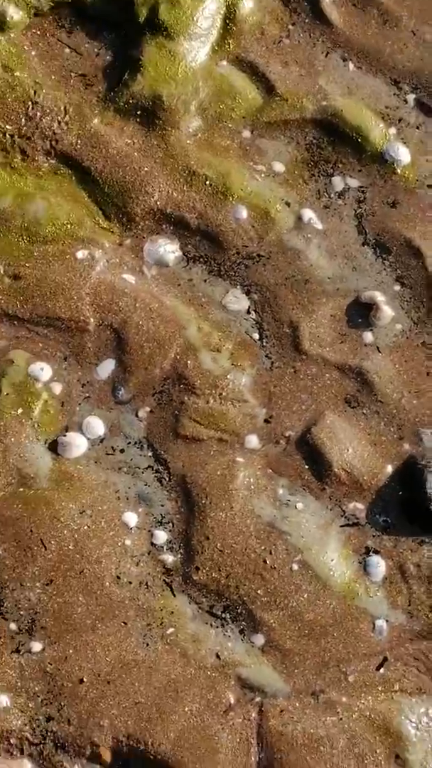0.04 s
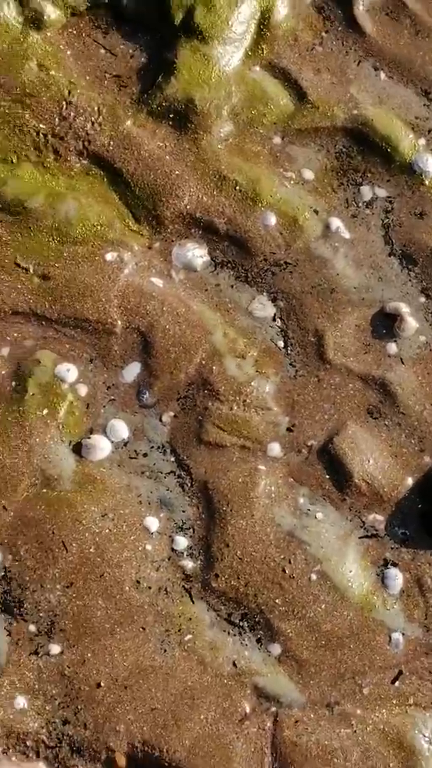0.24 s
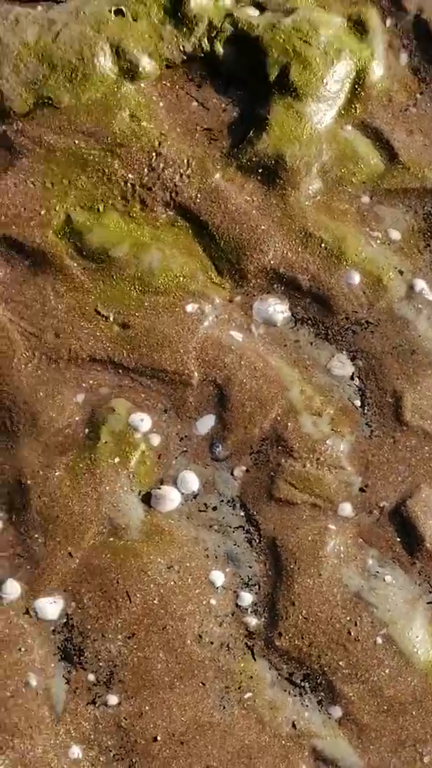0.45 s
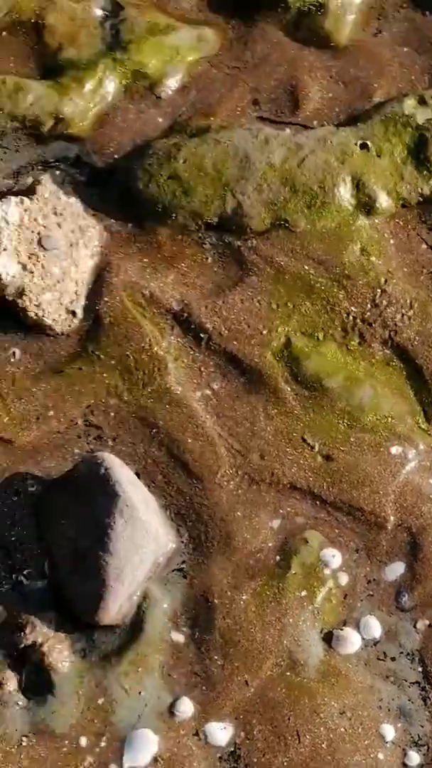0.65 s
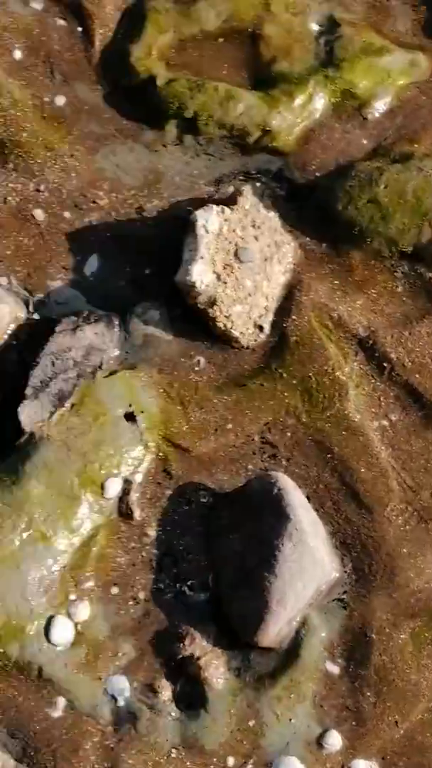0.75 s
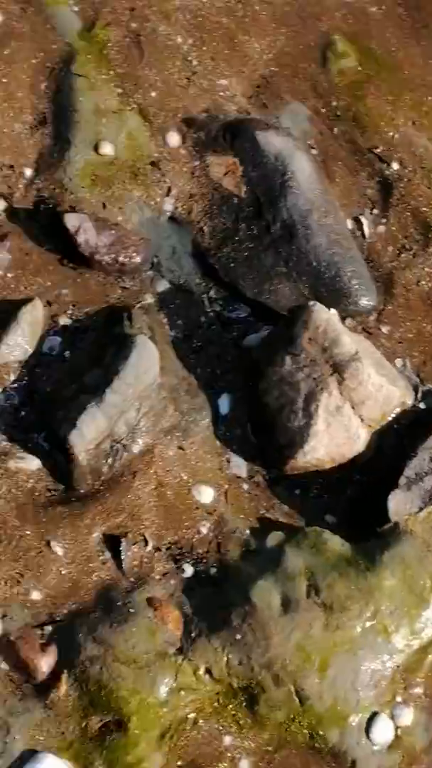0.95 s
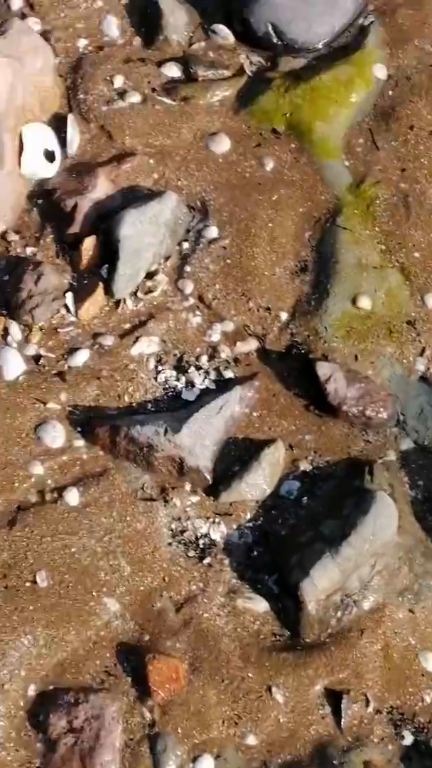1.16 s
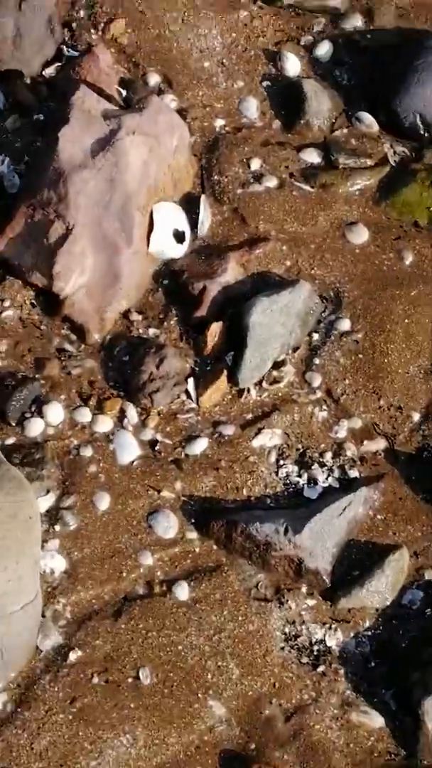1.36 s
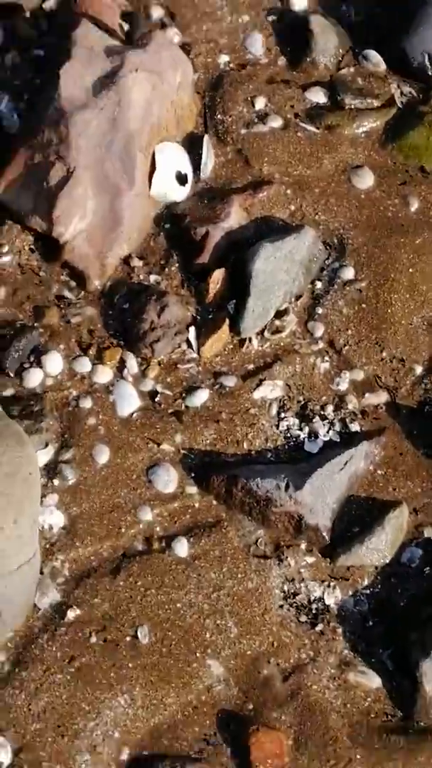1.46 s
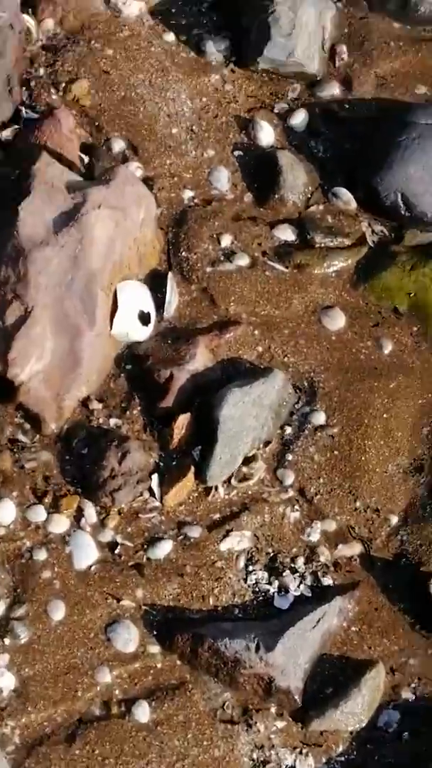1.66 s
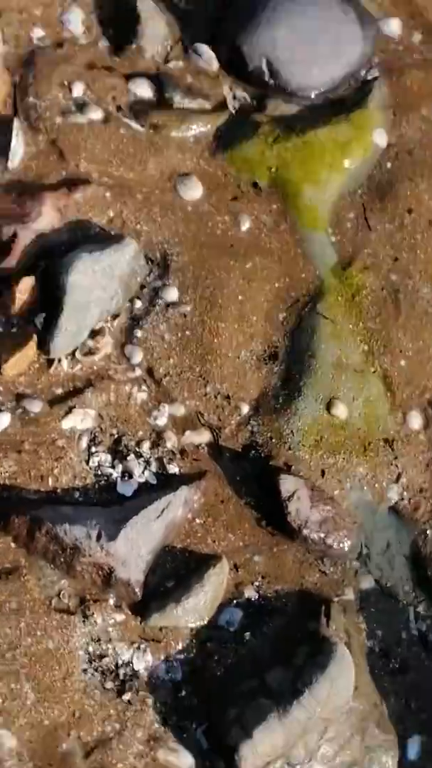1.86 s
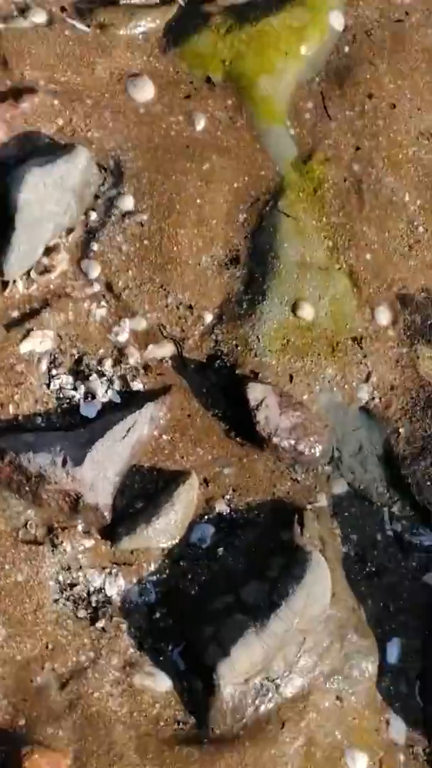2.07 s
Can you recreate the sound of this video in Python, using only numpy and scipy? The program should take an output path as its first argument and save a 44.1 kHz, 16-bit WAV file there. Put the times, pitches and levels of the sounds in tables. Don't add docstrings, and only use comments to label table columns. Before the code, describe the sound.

Stones and shells being gathered into a hollow holder on an open beach, very close. Until 0.35 s fingers rub it with short humming squeaks; hollow knocks and first clacks come at 0.36-0.55 s, a singing rub near 0.72 s. A heavy stone lands at 0.96 s, then bright clacks and gritty crunches thin towards 2.1 s. Holder sounds lean right; faint surf and hiss underneath.

```python
import sys
import numpy as np
from scipy import signal
from scipy.fft import rfft, irfft, next_fast_len
from scipy.io import wavfile
from scipy.ndimage import uniform_filter1d

SR = 44100
rng = np.random.default_rng(int(sys.argv[2]) if len(sys.argv) > 2 else 0)


def volts(x):
    e = np.asarray(x, float) / 20
    return 10 ** e


def put_to_file(sound):
    columns = np.atleast_2d(sound).T
    safe = np.clip(columns, -1, 1)
    whole_steps = np.round(safe * 32767)
    wavfile.write(sys.argv[1], SR, whole_steps.astype(np.int16))


N = 92610

# pitch_hz, width_hz, level_db
BOTTOM_RING = [(162.6, 19.6, 1.5), (196.7, 64, -3.5)]
MIDDLE_RING = [(284.6, 57.7, 8.5), (229.6, 46, -8), (363, 99, -11)]
UPPER_RING = [(700, 60.3, 6), (642, 47, 0.5), (729, 170, -9)]
# time_s, pitch_hz
GRIP_PITCH = [(0, 734), (.25, 785), (.4, 700), (.72, 702), (.76, 704)]


def evened(x):
    return x / np.sqrt(np.mean(x ** 2) + 1e-20)


def read(points, hz):
    f, value = np.transpose(points)
    return np.interp(np.log(hz + 1), np.log(f + 1), value)


def curve(points, axis=1):
    points = np.array(points)
    return np.interp(np.arange(N) / SR, points[:, 0], points[:, axis])


def colour(x, points, lag=0):
    size = 2 * next_fast_len(x.shape[-1] // 2 + 1024)
    hz = np.fft.rfftfreq(size, 1 / SR)
    log_gain = np.log(volts(read(points, hz)))
    mirrored = np.r_[log_gain, log_gain[-2:0:-1]]
    phase = -signal.hilbert(mirrored).imag[:len(hz)] - 2 * np.pi * hz * lag
    return irfft(rfft(x, size) * np.exp(log_gain + 1j * phase), size)[..., :x.shape[-1]]


def ring(x, hz, width, order=1):
    turn = np.exp(2j * np.pi * np.cumsum(hz * np.ones(x.shape[-1])) / SR)
    r = np.exp(-np.pi * width / SR)
    low = x / turn
    for _ in range(order):
        low = signal.lfilter([1 - r], [1, -r], low)
    return 2 * (low * turn).real


def body(x, group, shift=1):
    return sum(volts(db) * ring(x, hz * shift, width * 1.47, order=2) for hz, width, db in group)


def clicks(count, per_s, spread_db):
    chance, side, size = rng.random((count, 3)).T
    loudness = volts(spread_db * np.minimum(-np.log(size + 1e-9), 4))
    return (chance < per_s / SR) * np.sign(side - .5) * loudness


def ports(count, per_s, spread_db):
    shared = 0.74
    both, left, right = (clicks(count, per_s / 2, spread_db) for _ in range(3))
    return np.array([shared * both + left, shared * both + right])


def add(mix, s, sound):
    part = mix[round(s * SR):][:len(sound)]
    part += sound[:len(part)]


def beach():
    # pitch_hz, level_db
    surf_tone = [(20, 11), (60, -1), (250, -3), (600, -10.5), (1300, -31), (4300, -34), (9000, -47),
                 (15000, -44)]
    surf_db, hiss_db = -47.5, -59
    hiss_hz, hiss_width_hz = 6370, 2300
    a, b, c, d = rng.standard_normal((4, N))
    surf = np.array([colour(a, surf_tone), colour(0.33 * a + 0.36 * b, surf_tone)])
    surf = evened(surf) * volts([[-2.5], [2.]])
    edges = hiss_hz + np.array([-.5, .5]) * hiss_width_hz
    hiss = signal.sosfilt(signal.butter(4, edges, "band", fs=SR, output="sos"), [c, d])
    return volts(surf_db) * surf + volts(hiss_db) * evened(hiss) * volts([[-3.], [3.]])


def grit():
    # time_s, level_db
    grit_level = [(.3, -59), (.5, -66), (.55, -38.5), (.65, -48), (.68, -55.5), (.74, -41), (.79, -60.5),
                  (.91, -62.5), (.98, -37.5), (1.12, -47.5), (1.27, -49), (1.31, -49.5), (1.39, -41),
                  (1.43, -53), (1.54, -42), (1.62, -51), (1.67, -47), (1.76, -55), (2.05, -53)]
    # pitch_hz, level_db
    grain_tone = [(500, -7), (1200, 0), (2200, 0.5), (3800, -4.5), (7500, -9.5), (14000, -23.5),
                  (16000, -73)]
    grains_per_s = 5600
    clumps = volts(2.0 * evened(uniform_filter1d(rng.standard_normal(N), 400)))
    grains = np.zeros((2, N))
    for hz in np.geomspace(800, 13000, 8):
        grains += ring(ports(N, grains_per_s / 8, spread_db=4.0), hz, hz * 0.37)
    return evened(colour(grains * clumps, grain_tone)) * volts(curve(grit_level))


def rubbing():
    # time_s, level_db, middle_against_upper_db
    rub_level = [(0, -50.5, -4), (.06, -41.5, 3), (.22, -34.5, 1.5), (.31, -31, -5), (.35, -42, -0.5),
                 (.58, -39, 8.5), (.68, -43.5, 2.5), (.71, -34, -8), (.77, -36.5, 4.5), (.82, -60, 17),
                 (.92, -50.5, -4), (1.02, -31, -0.5), (1.15, -51, 10), (1.38, -43, 6.5), (1.46, -57.5, 5),
                 (1.58, -43.5, 3), (1.72, -47.5, 13), (1.98, -59.5, -0.5)]
    # pitch_hz, width_hz, level_db
    edge_rasp = [(1180, 310, 1.5), (1410, 206, -4)]
    rubs_per_s, bottom_db, rasp_db = 650, -11, -4.5
    runs, waver = (evened(uniform_filter1d(v, 700)) for v in rng.standard_normal((2, N)))
    drive = clicks(N, rubs_per_s, spread_db=3.0) * volts(2.46 * runs)
    drive = signal.lfilter(*signal.butter(2, 2000, fs=SR), drive)
    low = evened(body(drive, MIDDLE_RING)) + volts(bottom_db) * evened(body(drive, BOTTOM_RING))
    shift = curve(GRIP_PITCH) / UPPER_RING[0][0] * (1 + 0.058 * waver)
    upper = evened(body(drive, UPPER_RING, shift))
    scrape = drive + clicks(N, rubs_per_s * 2, spread_db=3.0)
    upper = upper + volts(rasp_db) * evened(body(scrape, edge_rasp))
    return (upper + low * volts(curve(rub_level, axis=2))) * volts(curve(rub_level))


def sings():
    # start_s, peak_db, pitch_hz, length_s
    slips = [(0.043, -35, 794, 0.011), (0.118, -26, 732, 0.014), (0.152, -31.5, 753, 0.0083),
             (0.178, -26, 700, 0.019), (0.22, -21, 804, .014), (0.253, -19.5, 730, 0.01),
             (.269, -18, 693, 0.011), (0.288, -20.5, 700, .008), (0.299, -28.5, 726, 0.013),
             (0.313, -26, 734, 0.017), (0.604, -31, 724, .012), (0.645, -29.5, 695, 0.037),
             (.694, -26.5, 722, 0.04), (0.7175, -13, 735, .013), (0.748, -12, 700, 0.024)]
    rise, fall = 0.14, 1.56
    out = np.zeros(N)
    for s, db, hz, length in slips:
        u = np.arange(0, 2.5 * length, 1 / SR) / length
        shape = np.minimum(u / rise, 1) * np.exp(-fall * u ** 2)
        add(out, s, volts(db) * shape * np.sin(2 * np.pi * hz * length * u))
    return out


def clacks():
    # start_s, peak_db, first_hz, second_hz, rattle_s
    damp_taps = [(.116, -44, 1260, 1480, 0.0034), (.208, -33, 1660, 1300, 0.014),
                 (.229, -29.5, 1430, 1720, 0.0091), (.304, -52, 1460, 2150, 0.0035),
                 (.3575, -19.5, 1320, 1710, 0.011), (.5028, -24, 1350, 3000, 0.0059),
                 (.401, -29.5, 1120, 1440, 0.013), (.434, -28, 1140, 1590, 0.011),
                 (.498, -18.5, 1200, 1520, 0.0074), (.924, -24.5, 1720, 1220, 0.0051),
                 (.9487, -12, 1200, 2100, 0.0031), (1.9765, -28, 1320, 3340, 0.00088),
                 (1.997, -29.5, 1300, 1670, 0.0022)]
    # start_s, peak_db, lower_hz, upper_hz, rattle_s
    bright_clacks = [(0.536, -13, 1180, 2800, 0.0053), (0.543, -17, 1090, 2830, 0.012),
                     (0.605, -26, 1940, 3980, 0.0021), (0.624, -20.5, 2150, 5520, 0.014),
                     (0.6923, -30, 1850, 4860, 0.0043), (0.718, -24.5, 1280, 3000, 0.0052),
                     (0.7362, -24, 1080, 2730, 0.01), (0.8014, -32.5, 1830, 3300, 0.011),
                     (0.825, -27, 1940, 3770, 0.0094), (0.962, -8, 1130, 2680, 0.0031),
                     (0.9722, -11.5, 1530, 3150, 0.0047), (0.9954, -18.5, 1920, 2827, 0.006),
                     (1.0346, -23.5, 1670, 2810, 0.0051), (1.038, -29, 2340, 2820, 0.006),
                     (1.0534, -37, 2070, 2940, 0.0054), (1.0912, -23.5, 2120, 3000, 0.0052),
                     (1.1025, -22, 1700, 3000, 0.0033), (1.1263, -24, 1130, 4960, 0.0029),
                     (1.157, -26, 2800, 3450, 0.0051), (1.1664, -25.5, 1980, 2800, 0.0047),
                     (1.1908, -17.5, 1690, 5160, 0.0075), (1.208, -30, 2390, 3890, 0.0056),
                   (1.215, -19.5, 2050, 3500, 0.0075), (1.2477, -11, 2040, 3200, 0.0069),
                   (1.2554, -20, 2100, 2760, 0.0083), (1.2663, -19, 1210, 3750, 0.0027),
                   (1.283, -24, 1910, 4130, 0.0073), (1.3167, -30, 1200, 4880, 0.0061),
                   (1.3254, -44, 1180, 3920, 0.0029), (1.332, -25.5, 2074, 2730, 0.0023),
                   (1.3645, -31, 1120, 3680, 0.0046), (1.3712, -29.5, 2090, 3840, 0.0082),
                   (1.3904, -31, 2220, 2800, 0.0034), (1.3946, -41, 2320, 2770, 0.005),
                   (1.422, -34.5, 2170, 3720, 0.0046), (1.4704, -26.5, 2240, 2920, 0.0054),
                   (1.504, -42, 1230, 3880, 0.0033), (1.5209, -21.5, 2220, 3740, 0.0053),
                   (1.5364, -22, 2010, 4170, 0.0035), (1.5636, -17, 2220, 3300, 0.0017),
                   (1.5857, -25, 2190, 4630, 0.0023), (1.6262, -38.5, 1260, 4420, 0.0069),
                   (1.6645, -26, 2010, 2720, 0.013), (1.695, -28, 1900, 2670, 0.0087),
                   (1.7187, -28, 2090, 2600, 0.0055), (1.7973, -35, 2020, 2860, 0.0059),
                   (1.8152, -30, 1980, 2680, 0.0096), (1.8251, -23, 1980, 2740, 0.014),
                   (1.8616, -34, 1850, 2960, 0.0057), (1.9049, -35.5, 2650, 2800, 0.0069),
                   (1.9145, -33, 2060, 2980, 0.014), (2.032, -44, 1780, 3780, 0.0054),
                   (2.0547, -52, 2390, 5900, 0.0029), (2.0854, -33.5, 2590, 3050, 0.005),
                   (2.0964, -40, 1620, 2800, 0.0037)]
    # pitch_hz, level_db
    stone_tone = [(500, -6.5), (1200, 7), (2200, -0.5), (3800, -7), (7300, -10), (13000, -19.5),
                  (16000, -83)]
    snap_s, rise_s, rattle_db = 0.0026, 0.00079, 2
    upper_db, stray_db = -6, -8.5
    out, t = np.zeros((2, N)), np.arange(3000) / SR
    for rows, crack_db in ((damp_taps, -18.), (bright_clacks, -2.)):
        for s, db, hz, upper_hz, length in rows:
            shape = np.exp(-t / snap_s) + volts(rattle_db) * np.exp(-t / max(length, .001))
            drive = shape * np.minimum(t / rise_s, 1) * ports(len(t), 14000, spread_db=3.4)
            crack = evened(colour(drive, stone_tone))
            drive[:, 0] = 4.6
            modes = ring(drive, hz, 676, order=2)
            modes = modes + volts(upper_db) * ring(drive, upper_hz, 870, order=2)
            stray_hz = hz * rng.uniform(1.374, 2.21)
            modes = modes + volts(stray_db) * ring(drive, stray_hz, 940, order=2)
            sound = evened(modes) + volts(crack_db) * crack
            add(out.T, s, volts(db) * sound.T / abs(sound).max())
    return out


def knocks():
    # start_s, upper_db, bottom_db, middle_db, contact_s
    blows = [(0.357, -11, -13, -11, 0.014), (0.401, -13, -21, -19.5, 0.011),
             (0.435, -14, -16.5, -51, 0.0019), (0.498, -15.5, -18, -24.5, 0.0079),
             (0.5373, -17.5, -20, -12, 0.013), (0.553, -17.5, -16.5, -18, 0.026),
             (0.7165, -28, -19.5, -37, 0.022), (0.746, -24.5, -56, -26.5, 0.018),
             (0.9508, -20.5, -18.5, -19.5, 0.0044), (0.9623, -16, -3.5, -10, 0.009),
             (0.998, -22.5, -9.5, -21, 0.0068), (1.092, -20.5, -19.5, -18.5, 0.014),
             (1.215, -28, -55, -30.5, 0.013), (1.249, -26, -51, -19.5, 0.011),
             (1.517, -30, -17.5, -26.5, 0.035), (1.561, -29.5, -25.5, -40, 0.037),
             (1.669, -33.5, -27, -33.5, 0.018), (1.825, -25, -63, -29.5, 0.025)]
    # start_s, level_db
    hand_thuds = [
        (0.356, -22),
        (0.96, -27.5),
        (1.513, -26),
        (1.665, -32),
    ]
    # pitch_hz, width_hz, level_db
    thud_ring = [(78, 73, 0)]
    slips_per_s, slip_db = 1400, -14
    groups = (UPPER_RING, BOTTOM_RING, MIDDLE_RING)
    trims_db = (2.5, -3.5, 2.5)
    out, t = np.zeros(N), np.arange(5000) / SR
    grip = curve(GRIP_PITCH) / UPPER_RING[0][0]
    for s, *levels, length in blows:
        contact = np.exp(-(t / max(length, .001)) ** 2)
        drive = volts(slip_db) * clicks(len(t), slips_per_s, spread_db=4.5) * contact
        drive[0] = 1
        shifts = (grip[round(s * SR)], 1, 1)
        for db, trim_db, group, shift in zip(levels, trims_db, groups, shifts):
            rung = body(drive, group, shift)
            add(out, s, volts(db + trim_db) * rung / abs(rung).max())
    thud = body(t == 0, thud_ring)
    for s, db in hand_thuds:
        add(out, s, volts(db) * thud / abs(thud).max())
    return out


def scene():
    # pitch_hz, level_db
    held_left = [(60, -8.5), (200, -10.5), (400, -13.5), (750, -13), (1300, -7)]
    # pitch_hz, level_db
    air_left = [(700, -4), (1300, 0), (2400, -1.5), (4400, -4.5), (8000, -4), (15000, 0)]
    # time_s, level_db
    drift = [(.5, 0.5), (.8, -4.5), (1., -4.5), (1.3, 1), (2.1, 1.5)]
    held_lag_s, air_lag_s = 0.00027, 0.000382
    held = knocks() + rubbing() + sings()
    air = clacks() + grit()
    held = volts(-0.5) * np.array([colour(held, held_left, held_lag_s), held])
    left_air = colour(air[0], air_left, air_lag_s) * volts(curve(drift))
    return held + volts(4.5) * np.array([left_air, air[1]]) + beach()


def band_limit(x):
    return signal.sosfilt(signal.butter(12, 16370, fs=SR, output="sos"), x)


def record(dry):
    dry = signal.sosfilt(signal.butter(12, 21000, fs=SR, output="sos"), dry)
    dry = signal.sosfilt(signal.butter(2, 72, "high", fs=SR, output="sos"), dry)
    return band_limit(dry)


dry = scene()
out = record(dry)
put_to_file(out)
```